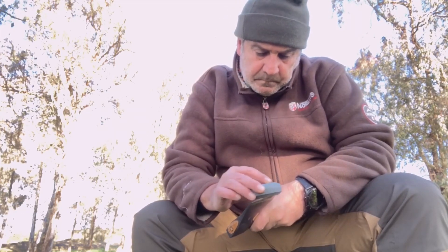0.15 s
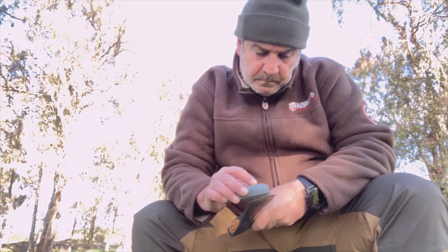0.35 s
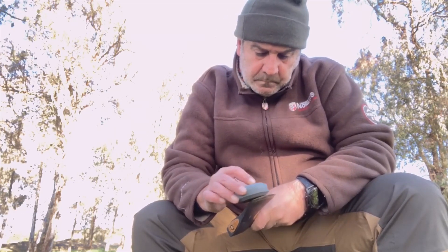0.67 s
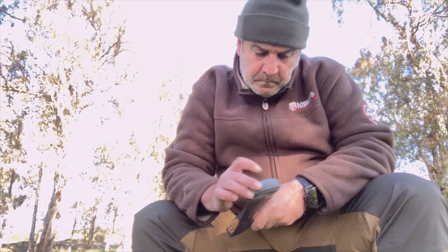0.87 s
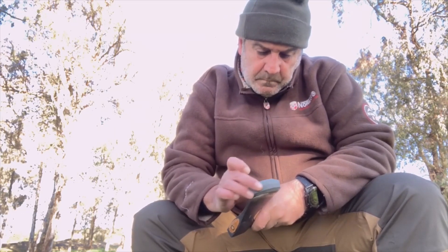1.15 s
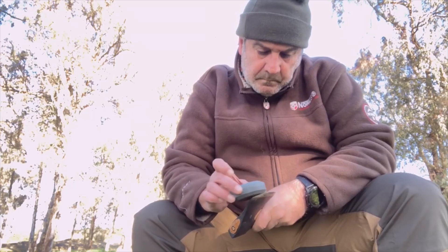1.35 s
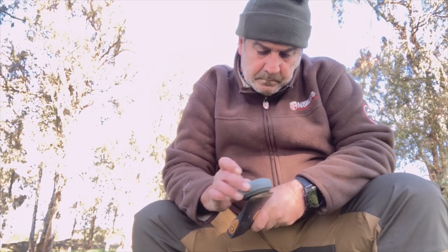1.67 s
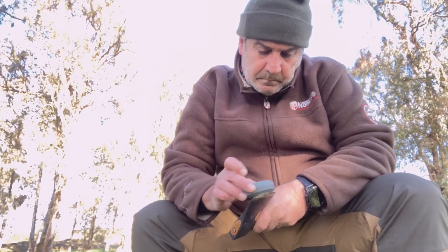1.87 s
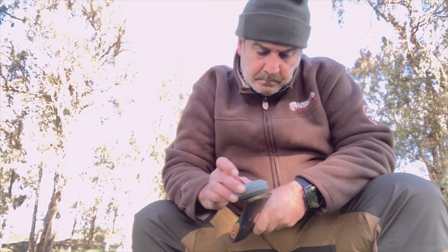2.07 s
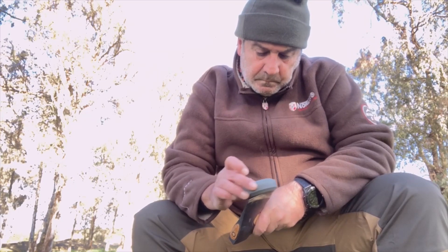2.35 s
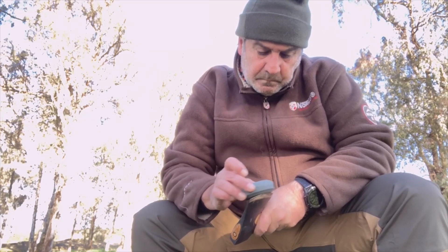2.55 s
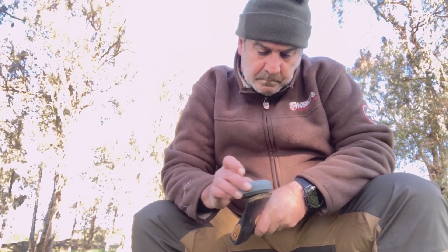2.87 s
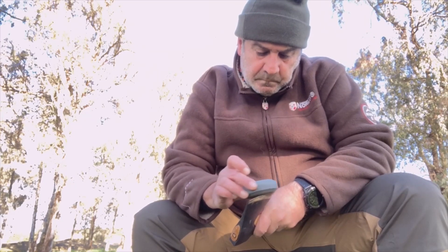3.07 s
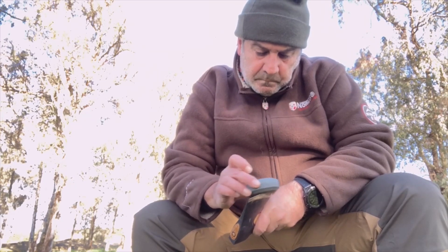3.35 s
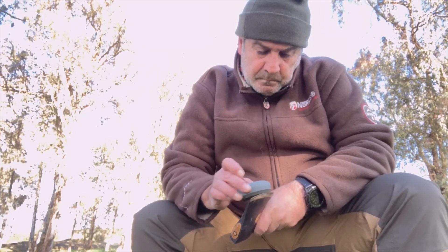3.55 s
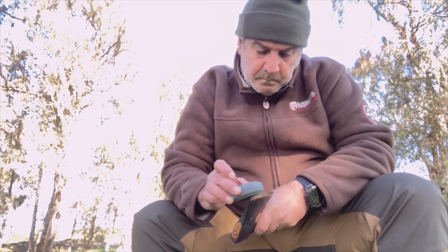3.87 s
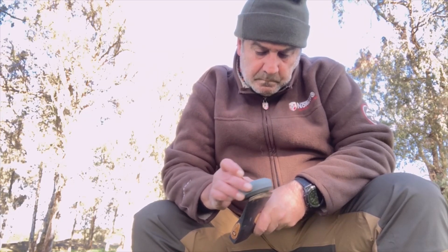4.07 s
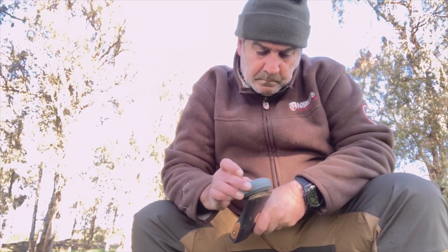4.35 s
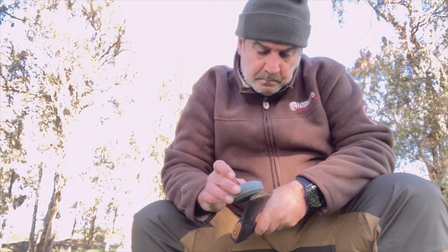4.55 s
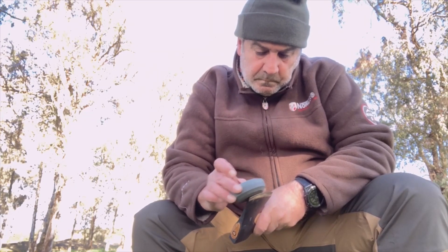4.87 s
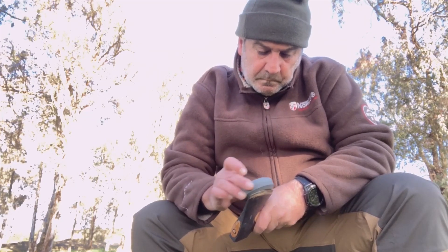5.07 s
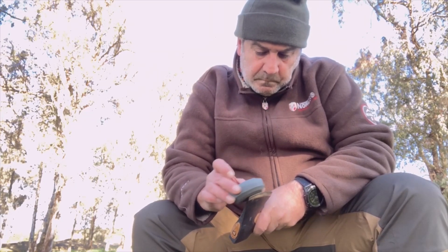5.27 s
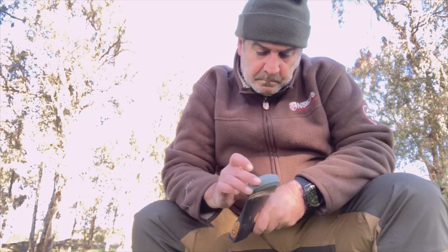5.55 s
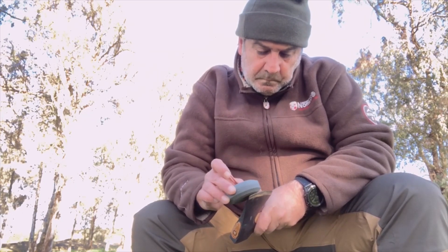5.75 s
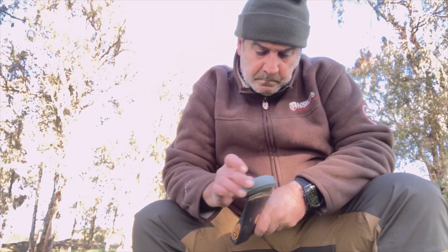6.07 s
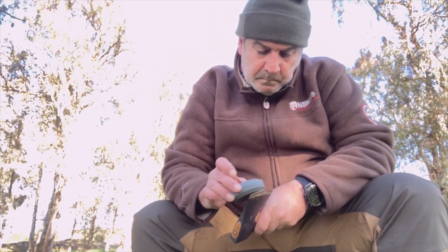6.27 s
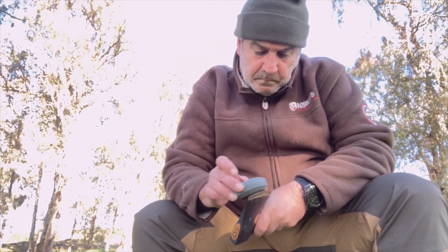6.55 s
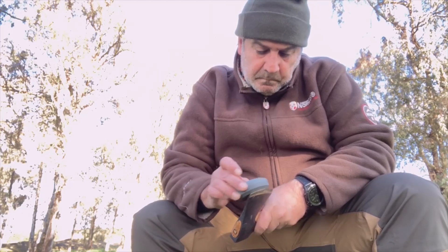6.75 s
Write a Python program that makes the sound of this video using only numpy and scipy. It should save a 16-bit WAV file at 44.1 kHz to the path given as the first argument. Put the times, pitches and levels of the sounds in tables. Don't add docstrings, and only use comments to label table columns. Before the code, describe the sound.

A round sharpening stone grinds in small circles along a steel axe edge, dense gritty scrapes with clicks and metallic ringing, light wind outdoors.

```python
import sys
import numpy as np
from scipy import signal
from scipy.fft import rfft, irfft, next_fast_len
from scipy.io import wavfile
from scipy.ndimage import uniform_filter1d

SR = 44100
rng = np.random.default_rng(int(sys.argv[2]) if len(sys.argv) > 2 else 0)


def gain_from_db(level_db):
    decades = np.asarray(level_db, float) / 20
    return 10 ** decades


def unload_audio(sound):
    columns = np.transpose(np.atleast_2d(sound))
    steps = np.round(np.clip(columns, -1, 1) * 32767)
    wavfile.write(sys.argv[1], SR, steps.astype(np.int16))


N = 304712
TIME = np.arange(N) / SR
SLOW_TIME = TIME[::128]


def rms_one(x):
    return x / np.sqrt(np.mean(np.abs(x) ** 2) + 1e-20)


def at_hz(points, hz):
    point_hz, value = np.transpose(points)
    return np.interp(np.log(hz), np.log(point_hz), value)


def drift(rate_hz):
    r = np.exp(-40 * np.pi * rate_hz / SR)
    noise = rng.standard_normal(N // 20 + 2002)
    slow = signal.lfilter([1], [1, -2 * r, r * r], noise)[2000:]
    return np.interp(np.arange(N) / 20, np.arange(len(slow)), rms_one(slow))


def bell(t, middle, spread):
    return np.exp(-((t - middle) / np.maximum(spread, 1e-3)) ** 2)


def swells(t, rows):
    return sum(gain_from_db(db) ** 2 * bell(t, s, long_s / 2) for s, long_s, db in rows)


def clicks(s, level_db):
    out = np.zeros(N)
    out[np.round(s * SR).astype(int)] = gain_from_db(level_db)
    return out


def blows(s, level_db, rise_s, rough):
    age = np.arange(1500) / (rise_s * SR)
    return signal.oaconvolve(clicks(s, level_db), age * np.exp(1 - age))[:N] * rough


def grit(per_s, spread_db):
    size = np.minimum(rng.exponential(1, N), 2.6)
    push = gain_from_db(spread_db * size) * rng.choice([-1, 1], N)
    caught = rng.random(N) < per_s / SR
    return rms_one(push * caught + 1e-9)


def ring(force, hz, width_hz):
    r = np.exp(-np.pi * width_hz / SR)
    turn = np.exp(2j * np.pi * np.cumsum(hz) / SR)
    slow = signal.lfilter([1], [1, -2 * r, r * r], force * turn.conj())
    unit_rms = np.sqrt(2 * (1 - r * r) ** 3 / (1 + r * r))
    return unit_rms * turn * slow


def body(modes, level_db, judder_db, struck, own_db, wander, stiffen, per_s, spread_db):
    out = np.zeros((2, N))
    grains = np.array([grit(per_s, spread_db), grit(per_s, spread_db)])
    pressed = stiffen * np.tanh((level_db - level_db.mean()) / 8)
    for hz, width_hz, mode_db, pan_db, lead, unlike in modes:
        push = gain_from_db(level_db + judder_db + mode_db + 1.51 * own_db * np.tanh(drift(7.9)))
        shuffled = np.roll(grains, rng.integers(N), axis=1)
        force = push * shuffled + gain_from_db(mode_db) * struck
        both, apart = ring(force, hz * (1 + pressed + wander * drift(4.7)), width_hz)
        unlike = np.clip(unlike, 0, .95) / np.sqrt(2)
        alike = np.sqrt(1 - unlike ** 2)
        left = alike * both + unlike * apart
        right = (alike * both - unlike * apart) * np.exp(1j * lead)
        out += np.real([left * gain_from_db(pan_db / 2), right * gain_from_db(-pan_db / 2)])
    return out


def coloured(pair, spectrum, likeness):
    size = next_fast_len(N)
    hz = np.maximum(np.fft.rfftfreq(size, 1 / SR), 10)
    mid, side = rfft(pair, size) * gain_from_db(at_hz(spectrum, hz))
    alike = np.clip(at_hz(likeness, hz), -.95, .99)
    mid, side = np.sqrt(1 + alike) * mid, np.sqrt(1 - alike) * side
    return rms_one(irfft(np.array([mid + side, mid - side]), size)[:, :N])


def spells(rows, length_s, loss_db, width_hz, pan_db, lead):
    s, db, hz = np.transpose(rows)
    power = swells(SLOW_TIME, zip(s + 0.37 * length_s, length_s + 0 * s, db - loss_db))
    level_db = np.interp(TIME, SLOW_TIME, 10 * np.log10(power + 1e-12))
    mode = [(np.interp(TIME, s, hz), width_hz, 0, pan_db, lead, .3)]
    return body(mode, level_db, 0, 0, own_db=4.5, wander=0.0087, stiffen=0, per_s=3000, spread_db=4.5)


# (frequency [Hz], level per Hz [dB])
AIR_COLOUR = [(35, -52), (60, -18), (98, 6.5), (269, -0.5), (400, 4.5), (520, -34), (880, -120)]
# (frequency [Hz], likeness [-1 to 1])
PORT_LIKENESS = [(60, 0.17), (150, 0.51), (380, 0.52), (950, 0.37), (2200, -0.54), (2500, -0.33),
                 (2800, -0.76), (5980, -0.24), (15000, -0.16)]


def far_air():
    return gain_from_db(-73) * coloured(rng.standard_normal((2, N)), AIR_COLOUR, PORT_LIKENESS)


# (middle [s], length [s], level [dB])
GUSTS = [(0.053, 0.068, -60), (0.286, 0.067, -63), (0.935, 0.053, -67), (1.006, 0.028, -53),
         (1.1, 0.083, -61), (1.267, 0.066, -63), (1.394, 0.043, -63), (1.495, 0.032, -44),
         (1.575, 0.071, -44), (1.746, 0.34, -61), (1.792, 0.087, -49), (2.021, 0.034, -54),
         (2.184, 0.028, -48), (2.464, 0.091, -60), (2.546, 0.13, -59.5), (3.027, 0.024, -62),
         (3.175, 0.073, -78), (3.642, 0.033, -62), (4.16, 0.035, -65), (4.31, 0.071, -64),
         (5.05, 0.11, -68), (5.23, 0.089, -65.5), (5.407, 0.04, -65), (6.75, 0.033, -61)]


def wind():
    push = rng.standard_normal((2, N))
    thump = signal.sosfilt(signal.butter(2, [95, 190], "band", fs=SR, output="sos"), push)
    deep = signal.sosfilt(signal.butter(3, [40, 82], "band", fs=SR, output="sos"), push)
    mid, side = deep + gain_from_db(-21.0) * thump
    breeze_power = gain_from_db(-75.5) ** 2
    strength = np.interp(TIME, SLOW_TIME, np.sqrt(breeze_power + swells(SLOW_TIME, GUSTS)))
    even = np.sqrt(uniform_filter1d(mid ** 2, size=1800) + 0.071 * np.mean(mid ** 2))
    lumps = gain_from_db(3.8 * np.tanh(drift(49.0)))
    return strength * lumps * rms_one((mid + 0.22 * side * [[1], [-1]]) / even)


# (middle [s], length [s], slips at start [per s], slips at end [per s], level [dB])
SQUEAKS = [
    (0.715, 0.024, 720, 500, -65),
    (0.899, 0.041, 350, 740, -65),
    (0.99, 0.027, 460, 550, -70),
    (1.012, .03, 630, 490, -67),
    (1.067, 0.03, 570, 430, -60.5),
    (1.426, 0.03, 560, 595, -63.5),
    (4.23, 0.048, 570, 630, -60.5),
    (4.809, 0.028, 600, 420, -64),
]
SQUEAK_PARTIALS = [
    5.5,
    6.5,
    -38,
]


def squeaks():
    out, unevenness = np.zeros(N), drift(130)
    for middle_s, length_s, first_hz, last_hz, level_db in SQUEAKS:
        along = np.linspace(0, 1, int(1.4 * length_s * SR))
        slip_hz = last_hz + (first_hz - last_hz) * (1 - along) ** 0.714
        turn = 2 * np.pi * np.cumsum(slip_hz + 60 * unevenness[:len(along)]) / SR
        stack = sum(gain_from_db(db) * np.sin((k + 1) * turn) for k, db in enumerate(SQUEAK_PARTIALS))
        start = int(middle_s * SR) - len(along) // 2
        out[start:start + len(along)] += gain_from_db(level_db + 5) * np.sin(np.pi * along) ** 1.5 * stack
    return out * gain_from_db([[-1.6], [1.6]])


# (time [s], peak level [dB])
SNAPS = [(0.1585, -35), (1.4501, -32), (1.5199, -24), (1.9435, -25), (2.1999, -23), (2.2817, -27),
         (3.065, -20), (3.344, -19), (4.692, -29), (4.8738, -38), (5.1173, -30), (6.544, -40)]


def snaps():
    s, db = np.transpose(SNAPS)
    rough = rng.standard_normal(N) + .6 * rng.standard_normal((2, N))
    burst = blows(s, db - 24.5, .0022, rough)
    return signal.sosfilt(signal.butter(2, 4500, "high", fs=SR, output="sos"), burst)


# (time [s], peak level [dB], pitch [Hz])
SHUDDERS = [(0.101, -49, 450), (0.89, -54, 480), (1.126, -52, 635), (1.276, -52.5, 496), (1.501, -51, 423),
            (1.654, -50, 502), (1.972, -42.5, 450), (2.292, -43, 454), (2.467, -69, 556), (2.573, -60, 442),
            (2.701, -45, 487), (2.938, -47, 450), (3.254, -43.5, 522), (3.725, -49, 490), (3.977, -58, 504),
            (4.072, -51, 447), (4.351, -53, 484), (4.729, -63, 467), (5.015, -61, 513), (5.132, -44, 473),
            (5.241, -59, 490), (5.472, -52, 620), (5.62, -46.5, 510), (5.72, -59, 494), (5.88, -46, 464),
            (6.067, -43.5, 483), (6.419, -38, 474), (6.71, -51, 508), (6.812, -60, 645), (6.894, -37, 517)]


def shudders():
    return spells(SHUDDERS, 0.051, loss_db=9.0, width_hz=81, pan_db=-1.5, lead=0.13)


# (time [s], peak level [dB], pitch [Hz])
WHINES = [(0.0169, -39, 2920), (0.2927, -40, 2870), (0.4643, -42, 2970), (0.6988, -41, 2970),
          (1.3528, -45.5, 2670), (1.5005, -38.5, 3460), (1.7479, -47, 2880), (2.137, -30.5, 2800),
          (2.564, -39, 2890), (2.825, -41, 2880), (3.0644, -42, 2870), (3.4436, -34, 2870),
          (3.5428, -31.5, 2890), (3.7823, -36, 2880), (3.923, -36, 2850), (4.1041, -44, 2930),
          (4.336, -45, 2940), (4.58, -37, 2820), (4.8733, -52, 2760), (4.9781, -37.5, 2810),
          (5.1527, -60, 3550), (5.2869, -34, 3540), (5.4021, -34.5, 2970), (5.5209, -53, 3300),
          (5.8107, -34, 2954), (6.1933, -37, 3500), (6.4672, -56, 2820), (6.6583, -39, 2700)]


def whines():
    return spells(WHINES, 0.06, loss_db=13.5, width_hz=160, pan_db=0.0, lead=1.66)


# (frequency [Hz], level per Hz [dB])
RASP_COLOUR = [(150, -53), (250, -42), (490, -2.5), (1030, -7.5), (1200, -19.5), (2490, -7), (3450, -20.5),
               (6000, -22.5), (8920, -29), (14700, -38), (15500, -67)]


def rasp(head_db, bit_db, fizz_db, judder_db):
    scrape = coloured(np.array([grit(9000, 13.3), grit(9000, 5.3)]), RASP_COLOUR, PORT_LIKENESS)
    stroke = gain_from_db(head_db - 20.0) + gain_from_db(bit_db - 20.0) + gain_from_db(fizz_db - 0.5)
    return stroke * gain_from_db(3.0 * judder_db) * scrape * gain_from_db([[-1.5], [1.5]])


# (time [s], peak level [dB])
KNOCKS = [(0.1304, -24.5), (0.2484, -36), (0.406, -55), (1.052, -39), (1.29, -33), (1.5, -50), (1.536, -39),
          (1.66, -33), (1.8422, -33), (1.945, -34), (2.1965, -34), (2.302, -34), (2.4665, -32.5),
          (2.5316, -44), (2.592, -29), (2.7418, -31), (2.884, -32), (2.94, -30), (2.971, -27), (3.071, -31),
          (3.1055, -34), (3.1375, -39), (3.2167, -34.5), (3.255, -28), (3.3854, -34), (3.542, -46),
          (3.564, -44), (3.608, -29), (3.6386, -24), (3.7023, -38), (3.928, -35), (3.947, -44),
          (3.9947, -28), (4.1838, -29), (4.2876, -44), (4.6177, -30.5), (4.658, -34.5), (4.729, -24.5),
          (5.044, -46), (5.08, -47), (5.4703, -43), (5.86, -28), (5.9558, -28.5), (6.0123, -53),
          (6.3274, -25.5), (6.3795, -25), (6.417, -25.5), (6.793, -35), (6.8585, -21.5), (6.8961, -27.5)]


def knocks():
    s, db = np.transpose(KNOCKS)
    return clicks(s, db + 16)


# (time [s], peak level [dB], brightness [dB])
TICKS = [(0.1588, -36, -26), (0.328, -41, -6), (0.7736, -39.5, -25), (1.45, -48, 0), (1.5064, -48, -17),
         (1.519, -28.5, -15), (1.944, -34, -13), (2.014, -35, -26), (2.1965, -31, -9), (2.283, -45, -11),
         (2.4099, -38.5, -35), (2.4573, -47, -18), (2.5145, -31, -24), (2.842, -37, -9),
         (2.9593, -38.5, -24), (3.0042, -41, -23), (3.025, -46, -16), (3.0633, -34, -20), (3.312, -36, -18),
         (3.346, -42, -14), (3.557, -40, -12), (3.5815, -39, -10), (3.6833, -40, -10), (3.722, -32, -24),
         (3.83, -40, -12), (4.037, -38, -24), (4.283, -49, -23), (4.3027, -32.5, -17), (4.3545, -36.5, -11),
         (4.4485, -36.5, -15), (4.617, -42, -23), (4.692, -31.5, -11), (4.8193, -34, -40),
         (4.872, -45, -18), (4.9884, -35.5, -31), (5.1203, -32.5, -18), (5.154, -34, -28),
         (5.4406, -35.5, -16), (5.5624, -33, -23), (5.6155, -37, -12), (5.8421, -61, -21),
         (5.983, -38, -14), (6.109, -35, -10), (6.213, -36, -22), (6.2412, -47, -17), (6.3091, -56, -16),
         (6.4095, -34, -18), (6.5176, -46, -14), (6.542, -37, 0), (6.8735, -35.5, -5.5)]


def ticks():
    s, db, bright_db = np.transpose(TICKS)
    crumble, rise_s = rng.choice([-1., 1.], (2, N)), 0.00052
    return blows(s, db, rise_s, crumble), blows(s, db + bright_db, rise_s, crumble)


# (pitch [Hz], width [Hz], level [dB], left-right [dB], right leads [rad], unlike share [0-1])
HANDLE = [(484, 100, -4, -1, 0.13, 0.27), (582, 99, -9.5, -3.5, 0.6, 0), (850, 172, -5, -5.5, 0.1, 0.37)]


def handle(level_db, judder_db, knock):
    return body(HANDLE, level_db, 1.0 * judder_db, gain_from_db(-15.5) * knock,
                own_db=3.0, wander=0.033, stiffen=-0.054, per_s=2500, spread_db=2.0)


# (pitch [Hz], width [Hz], level [dB], left-right [dB], right leads [rad], unlike share [0-1])
HEAD = [(1203, 98, -5.5, -1, .01, 0.048), (1309, 132, -4, -7.5, .01, 0.16)]


def head(level_db, judder_db, knock):
    chatter = np.hanning(241) * np.cos(2 * np.pi * 1316 * np.arange(-120, 121) / SR) / 60
    struck = signal.oaconvolve(knock, chatter, "same")
    return body(HEAD, level_db - .8, 3.4 * judder_db, struck,
                own_db=3.5, wander=0.014, stiffen=0.04, per_s=2500, spread_db=4.0)


# (pitch [Hz], width [Hz], level [dB], left-right [dB], right leads [rad], unlike share [0-1])
CHEEK = [(2155, 220, 0.38, -6, 2.09, 0.37)]


def cheek(level_db, judder_db, knock):
    return body(CHEEK, level_db + 1.0, 2.8 * judder_db, gain_from_db(-14) * knock,
                own_db=1.0, wander=0.0056, stiffen=0.0019, per_s=2000, spread_db=5.5)


# (pitch [Hz], width [Hz], level [dB], left-right [dB], right leads [rad], unlike share [0-1])
BIT = [(4010, 360, -8.5, -6.5, .01, 0.81), (4422, 265, -0.6, -8, 1.94, 0.44),
       (5316, 1250, -9.5, 1, 2.27, 0.51), (14600, 400, -22, -2, .1, 0.24)]


def bit(level_db, judder_db, tick):
    return body(BIT, level_db + 1.5, 4.7 * judder_db, gain_from_db(-14.5) * tick,
                own_db=-3.3, wander=0.0042, stiffen=0.012, per_s=1600, spread_db=1.5)


# (pitch [Hz], width [Hz], level [dB], left-right [dB], right leads [rad], unlike share [0-1])
DRAG = [(1600, 420, -2, -7, 0.062, 0.41), (1932, 116, -10, 0, 0.22, 0.35)]


def drag(level_db, judder_db, knock):
    return body(DRAG, level_db + 2.04, 5.1 * judder_db, gain_from_db(-29) * knock,
                own_db=1.0, wander=0.012, stiffen=0.0025, per_s=2500, spread_db=4.0)


# (pitch [Hz], width [Hz], level [dB], left-right [dB], right leads [rad], unlike share [0-1])
DISC = [(2870, 194, -3.5, -2.5, 1.71, 0.39), (3448, 327, -5, -5, 1.9, 0.32)]


def disc(level_db, judder_db, tick):
    return body(DISC, level_db + 0.5, 3.63 * judder_db, gain_from_db(-7) * tick,
                own_db=2.5, wander=0.01, stiffen=-0.012, per_s=1500, spread_db=4.5)


# (pitch [Hz], width [Hz], level [dB], left-right [dB], right leads [rad], unlike share [0-1])
EDGE = [(7280, 170, -10, -4.5, 0.088, 0.38), (7200, 3200, -7.5, 1.5, .1, 0.044),
        (8904, 750, -11.5, 0.5, .01, 0.12), (8996, 158, -7.5, -0.5, 0.014, 0.24),
        (9670, 630, -20, 2, .01, 0.16)]


def edge(level_db, judder_db, tick):
    song = body(EDGE, level_db - .6, 2.7 * judder_db, gain_from_db(-2.0) * tick,
                own_db=4.5, wander=.002, stiffen=0.0017, per_s=3900, spread_db=6.5)
    return signal.sosfilt(signal.butter(3, [6950, 9800], "band", fs=SR, output="sos"), song)


# (pitch [Hz], width [Hz], level [dB], left-right [dB], right leads [rad], unlike share [0-1])
FIZZ = [(10250, 2800, -12, .01, .01, 0.55), (12560, 1200, -11, .01, .01, 0.58),
        (14210, 70, -7.5, .01, 0.078, 0.078)]


def fizz(level_db, judder_db, spit):
    return body(FIZZ, level_db, 4.1 * judder_db, gain_from_db(4.5) * spit,
                own_db=3.5, wander=0.0021, stiffen=.002, per_s=2100, spread_db=-5.0)


# (start [s], length [s], force [dB], bite [dB], lean toward the edge [dB])
PUSHES = [(0.026, 0.23, -2.5, -2.7, -1.5), (0.378, 0.2, -9, 0, 5.5), (0.736, 0.19, -16, -1, 12),
          (1.088, 0.17, -3, 0, 4), (1.451, 0.18, -1, -0.5, 1), (1.824, 0.21, 1, -2, -0.5),
          (2.164, 0.22, 0.5, 0.5, 0.5), (2.523, 0.21, 0.5, 2.5, -1.5), (2.773, 0.41, -2.5, 2.5, -2.5),
          (3.175, 0.23, -0.5, 3.5, -3), (3.532, 0.19, 4, 0.9, -4), (3.91, 0.13, 2, -5.5, 0.5),
          (4.27, 0.14, -2, -17.5, -1), (4.58, 0.24, 2, 1.5, -2), (5.01, 0.17, -4.5, -4, 8),
          (5.439, 0.14, 1, -1, 0), (5.804, 0.27, 2, 0.8, -3), (6.298, 0.2, 3, 1.8, -5),
          (6.755, 0.2, 4, -3, -1)]
# (middle [s], length [s], force [dB], bite [dB])
RETURNS = [(0.008, 0.25, -8.5, 6.5), (0.307, 0.13, -7.5, 6), (1.035, 0.27, -9.5, 7.5), (1.33, 0.11, -8, 0),
           (1.68, 0.11, -10, 7), (2.13, 0.37, -8.5, 8.5), (2.503, 0.12, -8, 9), (2.766, 0.065, 6, -20),
           (3.145, 0.038, 4, -19), (3.4, 0.2, 2.5, -21.5), (3.815, 0.13, -1, 1), (4.186, 0.2, 4, -5),
           (4.53, 0.19, -3.5, -1), (4.931, 0.072, 10.5, -5), (5.316, 0.098, 3.5, -8),
           (5.738, 0.08, 9, -5.5), (6.239, 0.43, -7.5, 8), (6.652, 0.18, 4, -6)]
# (middle [s], length [s], dip [dB])
LIFTS = [(0.211, 0.011, 11), (0.583, 0.095, 4.5), (1.036, 0.027, 6), (1.475, 0.034, 14), (1.803, 0.074, 4),
         (2.075, 0.049, 7), (3.527, 0.0084, 14), (3.873, 0.018, 7.5), (4.232, 0.05, 12.5),
         (4.925, 0.076, 10), (5.762, 0.051, 5.5), (6.733, 0.019, 5), (0.235, 0.022, 3.5), (0.39, 0.022, 4),
         (0.692, 0.0068, 18), (2.781, 0.022, 6.5), (3.094, 0.023, 6), (3.277, 0.042, 6),
         (5.338, 0.044, 4.5), (5.45, 0.018, 5.5), (5.703, 0.018, 5), (5.794, 0.029, 5), (6.157, 0.04, 4),
         (6.737, 0.03, 1)]
# (middle [s], length [s], level [dB])
JOLTS = [(0.137, 0.014, 2.5), (0.293, 0.027, 3.5), (0.408, 0.031, 10.5), (1.869, 0.044, 6),
         (2.567, 0.046, 5.5), (2.984, 0.0089, -2), (3.138, 0.0063, -11), (3.924, 0.013, 4.5),
         (4.292, 0.022, 6.5), (4.654, 0.021, 7.5), (4.874, 0.012, 10.5), (5.33, 0.01, 2), (6.341, 0.016, 6),
         (6.408, 0.03, 4.5), (6.656, 0.011, 3.5), (6.876, 0.013, 2), (0.042, 0.017, 1), (0.073, 0.0066, 0),
         (0.191, 0.022, 2.5), (0.487, 0.013, 6), (2.547, .012, -3), (2.889, 0.063, 3.5), (3.266, 0.011, 3),
         (3.445, 0.014, 6), (5.49, .012, 0), (5.534, 0.012, 2.5), (5.65, .04, 4), (5.731, 0.019, -4.5),
         (5.862, 0.024, 2), (5.878, 0.015, 3), (5.977, 0.019, 4), (6.011, 0.018, 8)]
# (middle [s], length [s], level [dB])
SKIMS = [(0.205, 0.06, -60.5), (0.374, 0.056, -64.5), (1.11, 0.037, -55.5), (1.535, 0.14, -61.5),
         (1.849, 0.039, -58), (2.023, 0.11, -51), (2.21, 0.038, -62), (2.327, 0.047, -54.5),
         (2.553, 0.05, -64), (3.017, 0.053, -58), (3.359, 0.031, -56), (3.576, 0.046, -52),
         (3.713, 0.039, -50.5), (4.316, 0.097, -65), (4.618, 0.05, -55.5), (4.8, 0.097, -56.5),
         (5.18, 0.047, -54), (5.614, 0.053, -47.5), (5.843, 0.077, -56), (6.074, 0.14, -56),
         (6.511, 0.1, -51)]
# (time [s], pressure [dB], bite [dB])
CONTACT = [(0.0, -6.5, -9), (0.63, 4, 1.5), (1.26, -2.5, 1), (1.88, 1, 1), (2.51, 3.5, -3), (3.14, 4.5, -2),
           (3.77, 5.5, -1), (4.4, -2, 13.5), (5.03, 5.5, 3.5), (5.65, 5, 3.5), (6.28, -0.7, -3),
           (6.91, 4, 7)]
# (level [dB], loudest place [0-1], spread [lengths], share of bite [ratio], share of lean [ratio])
ON_PUSH = [
    (-53, 0.62, 0.24, 0.03, 0.61),
    (-46, 0.48, 0.47, 0.15, 0.73),
    (-53, 0.35, 0.61, 0.13, 0.58),
    (-54, 0.54, 0.33, 1.6, 0.59),
    (-58.5, 0, 0.57, -0.37, 0.2),
    (-59, 0.23, 0.73, -0.73, -1.5),
    (-54.5, 0.67, 0.49, -0.16, 1),
    (-59, 0.55, 0.28, 1.64, 0.42),
]
# (level [dB], lateness [lengths], spread [lengths], share of bite [ratio])
ON_RETURN = [
    (-54, 0.049, 0.31, 0.5),
    (-46.5, 0.048, 0.25, 0),
    (-78.5, 0.22, 0.17, -1.2),
    (-62, 0.00089, 0.25, 0.3),
    (-51, -0.016, 0.25, 0.54),
    (-47, 0.054, 0.33, 0.56),
    (-61.5, 0.13, 0.11, 2.5),
    (-74.5, 0.067, 0.25, 2.1),
]
# (level [dB], share of bite [ratio])
AT_REST = [
    (-69.5, -1.6),
    (-61, -1.96),
    (-65.5, -1.5),
    (-74.5, 0.42),
    (-66.5, -0.57),
    (-58, 0.53),
    (-63, 0.34),
    (-73, 0.84),
]
ON_SKIM = [
    -38,
    -40,
    -40,
    -51,
    -40,
    -9,
    7,
    -29,
]


def strokes():
    t = SLOW_TIME
    rest_s, pressure_db, rest_bite_db = np.transpose(CONTACT)
    pressure_db, rest_bite_db = np.interp(t, rest_s, pressure_db), np.interp(t, rest_s, rest_bite_db)
    start, length, force_db, bite_db, lean_db = np.transpose(PUSHES)[:, :, None]
    middle, span, back_db, back_bite_db = np.transpose(RETURNS)[:, :, None]
    hold = np.clip((t - start) / 0.03, 0, 1) ** 2
    skim = swells(t, SKIMS)
    dip_db = sum(db * bell(t, s, long_s / 2) for s, long_s, db in LIFTS)
    jolt_db = sum(db * bell(t, s, long_s / 2) for s, long_s, db in JOLTS)
    levels = []
    for on_push, on_return, at_rest, skim_db in zip(ON_PUSH, ON_RETURN, AT_REST, ON_SKIM):
        db, place, spread, bite, lean = on_push
        push = hold * gain_from_db(db + force_db + bite * bite_db + lean * lean_db) ** 2
        push = push * bell((t - start) / length, place, spread)
        db, late, spread, bite = on_return
        back = gain_from_db(db + back_db + bite * back_bite_db) ** 2 * bell((t - middle) / span, late, spread)
        db, bite = at_rest
        rest = gain_from_db(db + pressure_db + bite * rest_bite_db) ** 2
        power = push.sum(0) + back.sum(0) + rest + gain_from_db(skim_db) ** 2 * skim
        levels.append(np.interp(TIME, t, 10 * np.log10(power) - dip_db + jolt_db))
    return levels


# (time [s], level [dB])
COARSENESS = [(0, 6.5), (.6, 0), (1.2, -2.5), (1.6, 6.5), (2.1, -4), (2.5, -5.5), (2.8, 1.5), (3.3, -1),
              (3.5, -4), (4.1, 3), (4.6, -6.5), (5.0, 3.5), (5.4, 3), (5.9, 1), (6.2, -0.5), (6.5, 0),
              (6.7, -2.5), (6.91, 0.5)]


def sharpening():
    handle_db, head_db, cheek_db, bit_db, drag_db, disc_db, edge_db, fizz_db = strokes()
    judder_db = 1.05 * np.tanh(.75 * drift(45))
    coarse_db = np.interp(TIME, *np.transpose(COARSENESS))
    fizz_db, bit_db = fizz_db + coarse_db, bit_db + 0.44 * coarse_db
    knock = knocks()
    tick, spit = ticks()
    out = shudders() + whines() + rasp(head_db, bit_db, fizz_db, judder_db)
    out += handle(handle_db, judder_db, knock)
    out += head(head_db, judder_db, knock)
    out += cheek(cheek_db, judder_db, knock)
    out += bit(bit_db, judder_db, tick)
    out += drag(drag_db, judder_db, knock)
    out += disc(disc_db, judder_db, tick)
    out += edge(edge_db, judder_db, tick)
    out += fizz(fizz_db, judder_db, spit)
    return out


def scene():
    return far_air() + wind() + squeaks() + snaps() + sharpening()


def top_cut(x):
    return signal.sosfilt(signal.butter(12, 15710, fs=SR, output="sos"), x)


def record(dry):
    dull = signal.sosfilt(signal.butter(8, 15300, fs=SR, output="sos"), dry)
    return top_cut(dull)


dry = scene()
out = record(dry)
unload_audio(out)
```